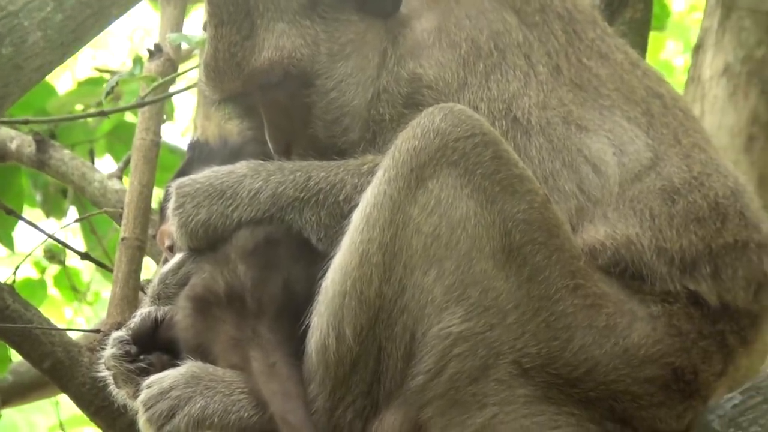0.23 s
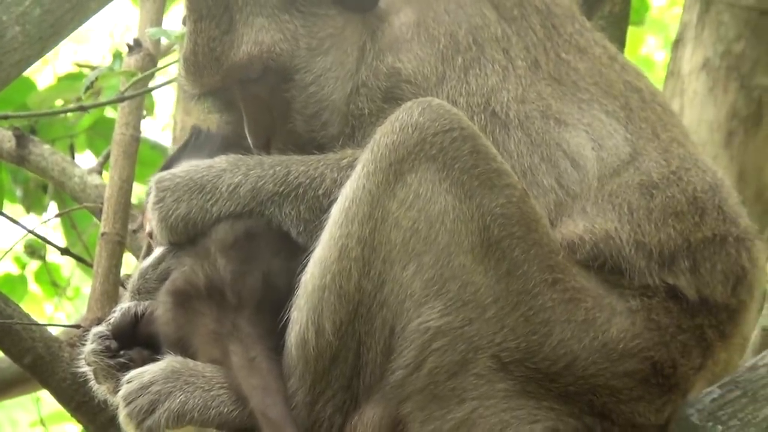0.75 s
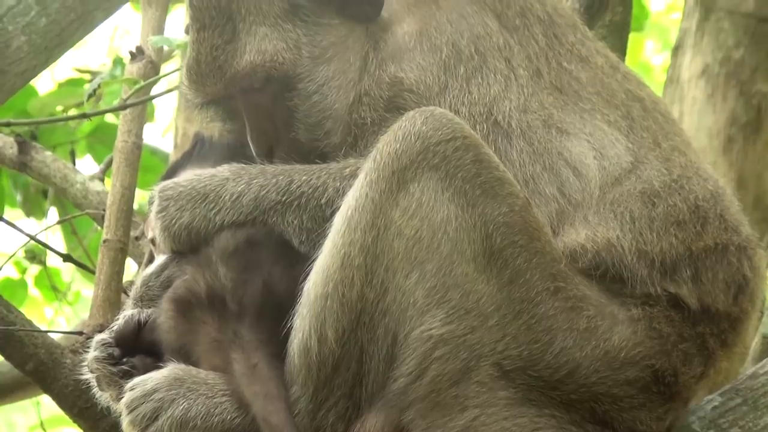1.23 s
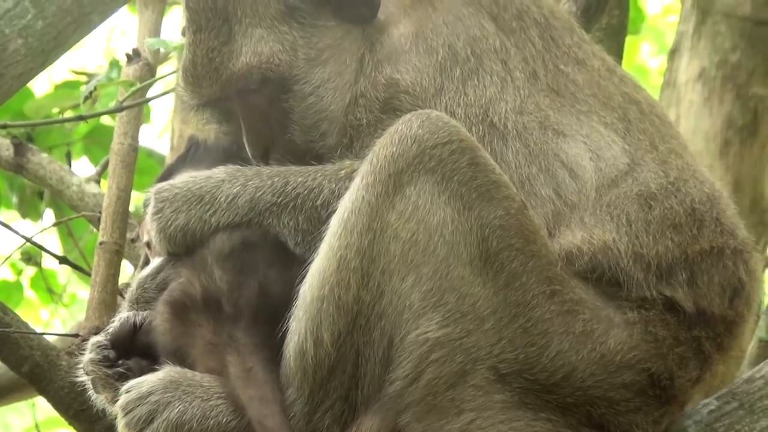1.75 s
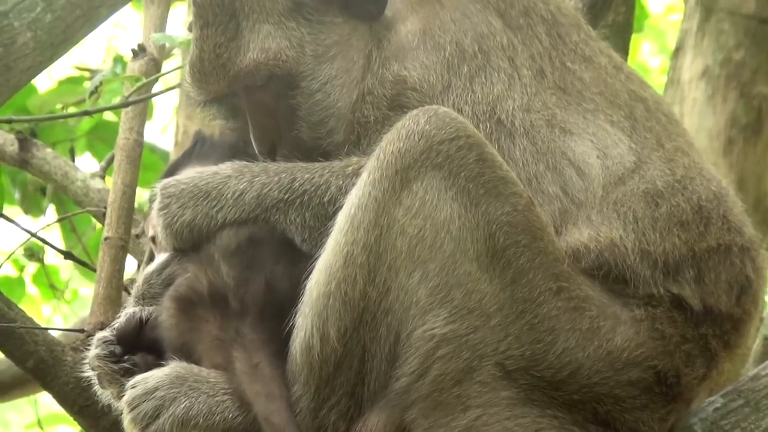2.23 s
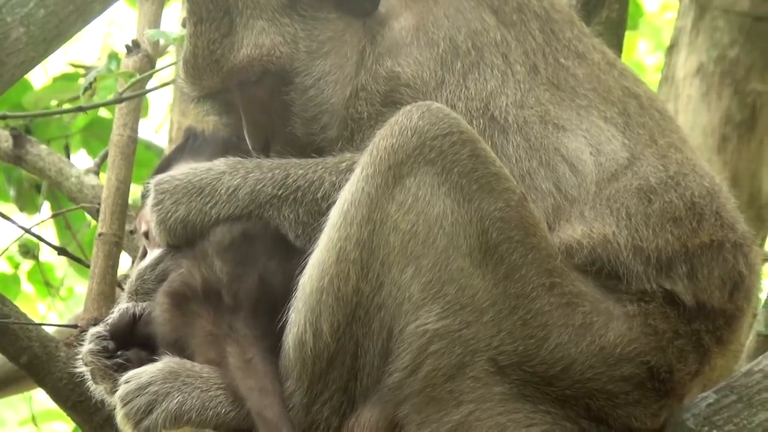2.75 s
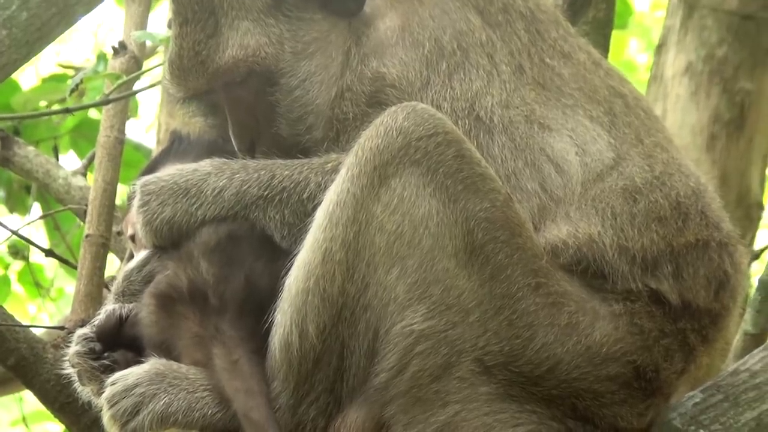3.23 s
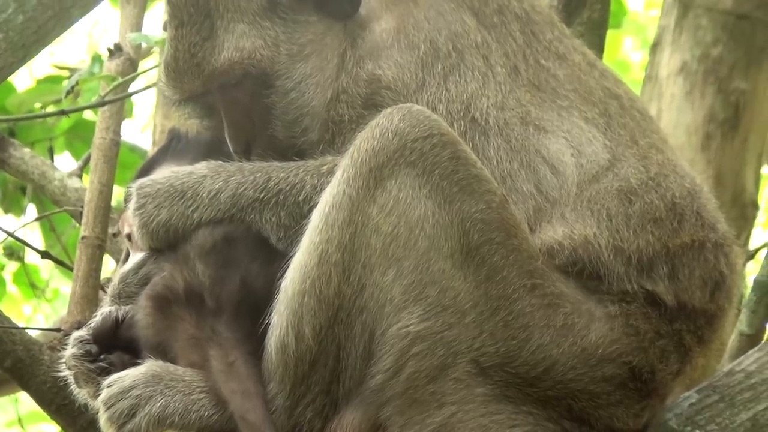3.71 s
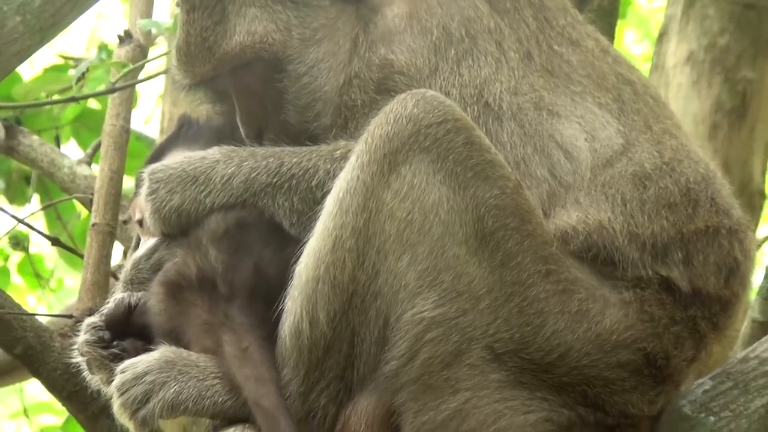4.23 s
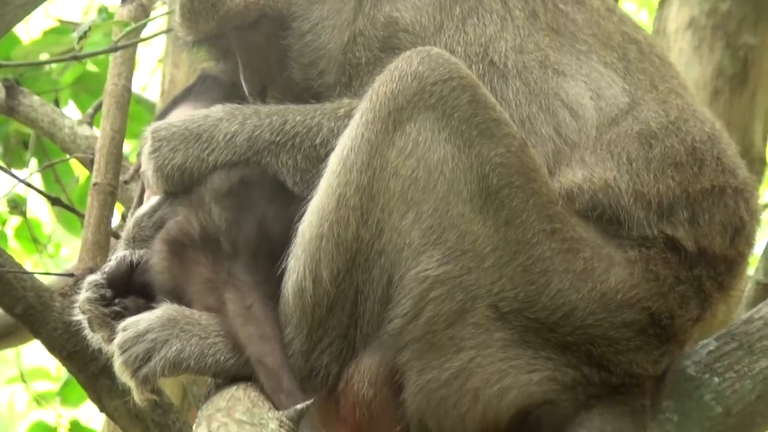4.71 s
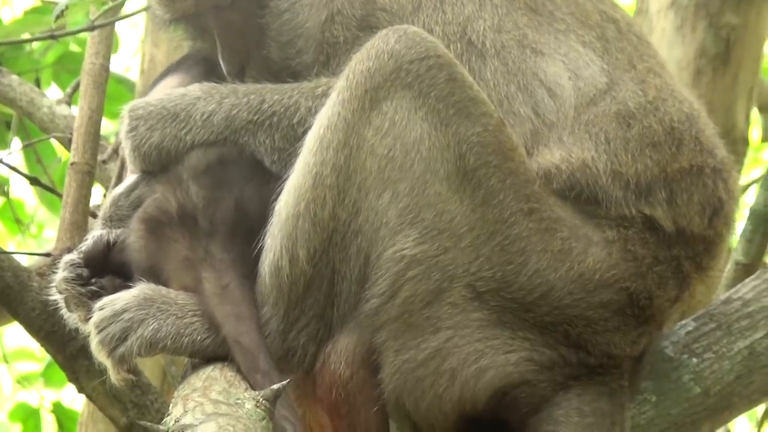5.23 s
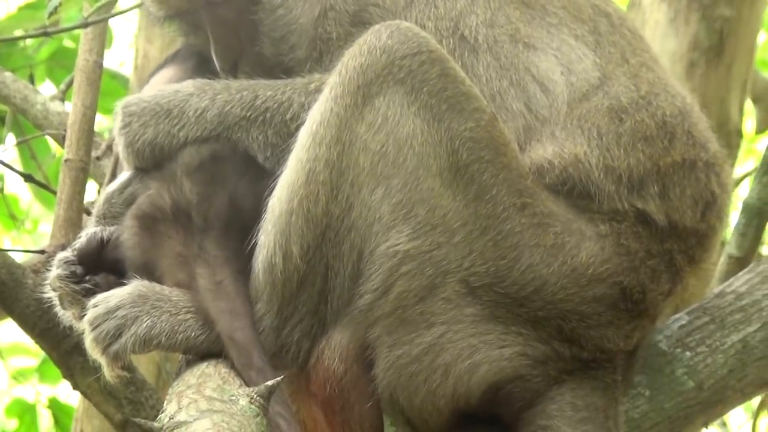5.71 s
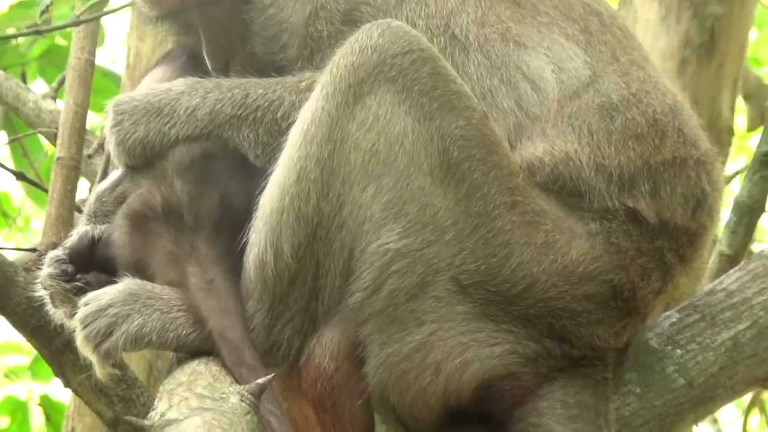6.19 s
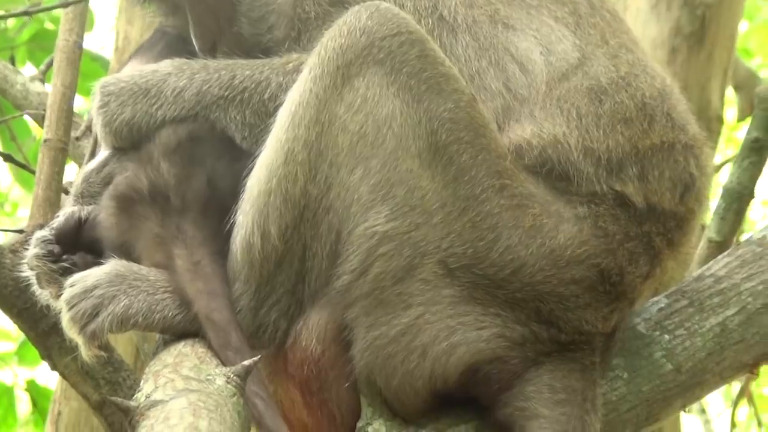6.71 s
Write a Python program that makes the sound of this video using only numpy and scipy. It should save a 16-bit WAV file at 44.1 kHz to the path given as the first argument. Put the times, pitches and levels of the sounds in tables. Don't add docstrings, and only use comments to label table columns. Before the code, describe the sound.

Five arched, whistle-like monkey coos, then four very high piercing squeals breaking into rasps, echoing among trees with rustling foliage and a low far rumble.

```python
import sys
import numpy as np
from scipy import signal
from scipy.fft import rfft, irfft
from scipy.io import wavfile
from scipy.ndimage import uniform_filter1d, map_coordinates

SR = 44100
rng = np.random.default_rng(int(sys.argv[2]) if len(sys.argv) > 2 else 0)


def natural_amplitude(level_db):
    exponent = np.asarray(level_db, float) / 20
    return 10 ** exponent


def bounce(signal):
    frames = np.transpose(np.atleast_2d(signal))
    limited = np.clip(frames, -1, 1)
    pcm = np.round(limited * 32767).astype(np.int16)
    wavfile.write(sys.argv[1], SR, pcm)


N = 306529
T = np.arange(N) / SR
FFT_N = N + 671

# [f/Hz, likeness 0 to 1]
LIKENESS = [(30, .99), (60, 1), (150, 0.89), (300, 0.88), (600, 0.87), (1500, 0.84), (3000, 0.96),
            (5000, 0.87), (10000, 0.74), (12500, 1)]
# [t/s, f/Hz]
COO_PITCHES = [
    [(.558, 1232), (.61, 1428), (.728, 1725), (.809, 1844), (.9, 1897), (1.005, 1826), (1.043, 1686),
     (1.077, 1380), (1.1, 1370)],
    [(1.248, 1083), (1.278, 1276), (1.31, 1383), (1.422, 1524), (1.545, 1546), (1.581, 1447), (1.625, 1470)],
    [(1.808, 1198), (1.845, 1412), (1.9, 1506), (1.96, 1515), (2.0, 1574), (2.06, 1552), (2.11, 1608),
     (2.18, 1521), (2.25, 1416)],
    [(2.495, 1403), (2.59, 1554), (2.715, 1461), (2.85, 1489), (2.95, 1496), (3.066, 1386), (3.11, 1428)],
    [(3.43, 1343), (3.54, 1332), (3.59, 1462), (3.72, 1432), (3.765, 1488), (3.84, 1469), (3.92, 1397),
     (3.97, 1376)],
]
# [t/s, level/dB, left minus right/dB]
COO_PEAKS = [
    (1.04, -39, -1),
    (1.52, -41.5, -2),
    (2.14, -40, 1),
    (2.97, -45, -0.7),
    (3.83, -42.5, 0.5),
]
# [t/s, f/Hz, level/dB]
SQUEAL_WHISTLES = [
    [(4.318, 8670, -46), (4.325, 8800, -40), (4.342, 9560, -38), (4.362, 9830, -43), (4.376, 10020, -36.5),
     (4.42, 10060, -36.5), (4.456, 9500, -36), (4.48, 9770, -43), (4.5, 9700, -33.5)],
    [(5.068, 8300, -43), (5.082, 9150, -36.5), (5.105, 9110, -40), (5.122, 8510, -38.5),
     (5.15, 8860, -43.5), (5.192, 9510, -32.5), (5.21, 8410, -39), (5.232, 8590, -42)],
    [(5.612, 8560, -41), (5.641, 9420, -37), (5.661, 8000, -40), (5.683, 8650, -35.5), (5.705, 8010, -39.5),
     (5.733, 9050, -36.5), (5.757, 8010, -38.5), (5.798, 8140, -42.5)],
    [(6.132, 8100, -52), (6.136, 8400, -34.5), (6.148, 9030, -35), (6.158, 9750, -32.5), (6.2, 9400, -36),
     (6.21, 9040, -41), (6.3, 9200, -37), (6.316, 8350, -36.5)],
]


def unit(x):
    return x / np.sqrt(np.mean(x ** 2) + 1e-20)


def along(points, hz):
    f, v = np.transpose(points)
    return np.interp(np.log(hz + 1), np.log(f + 1), v)


def curves(rows, edge=0.0077):
    s, *cols = np.transpose(rows)
    gate = np.clip(np.minimum(T - s[0], s[-1] - T) / edge + 1, 0, 1)
    return [gate] + [np.interp(T, s, c) for c in cols]


def phrases(tables, edge=0.0018):
    gate = sum(curves([rows[0][:1], rows[-1][:1]], edge)[0] for rows in tables)
    return [gate] + curves(sum(tables, []))[1:]


def moments(events, width_s):
    return sum(db * np.exp(-((T - s) / width_s) ** 2) for s, db in events)


def rounded(curve, seconds):
    return uniform_filter1d(curve, int(seconds * SR) + 1)


def wobble(rate):
    coarse = T[::8]
    knots = rng.standard_normal(int(N * rate / SR) + 4)
    return np.interp(T, coarse, map_coordinates(knots, [coarse * rate]))


def turns(hz):
    return 2 * np.pi * np.cumsum(hz) / SR


def glide(rows):
    gate, hz, db = curves(rows)
    return gate * natural_amplitude(db + 6.0) * np.sin(turns(hz))


def noise(spectrum, alike=((1, 1), (2, 1)), bands=()):
    hz = np.fft.rfftfreq(FFT_N, 1 / SR)
    turn = np.arccos(np.clip(along(alike, hz), -1, 1)) / 2
    level_db = along([(1, -120)] + list(spectrum) + [(SR / 2, -120)], hz)
    level_db = level_db + sum(db * np.exp(-((hz - c) / w * 2) ** 2) for c, w, db in bands)
    shape = natural_amplitude(level_db) * [np.cos(turn), np.sin(turn)]
    mid, side = irfft(rfft(rng.standard_normal((2, FFT_N))) * shape)[:, :N]
    return unit(np.array([mid + side, mid - side]))


def rumble():
    # [f/Hz, level/dB per Hz]
    far_colour = [(15, -42), (27, -16), (36, 0.5), (48, -4), (70, -4), (118, -4.5), (175, -14),
                  (215, -10.5), (380, -15), (508, -13.5), (667, -18), (1110, -18.5), (1700, -22.5),
                  (2000, -27.5), (5000, -34.5)]
    return natural_amplitude(-58.5 + 1.1 * wobble(8) + 0.11 * wobble(2.14)) * noise(far_colour, LIKENESS)


def engine():
    # [t/s, firing late by/s]
    hunting = [(0, .003), (1.2, .0033), (1.95, .0072), (2.75, .0079), (3.8, .0083), (4.8, .0079),
               (5.65, .006), (6.15, .0033), (6.95, -.003)]
    # [delay after firing/s, f/Hz, level/dB, t60/s]
    strokes = [
        (0, 122, -40.5, .036),
        (.004, 204.5, -63, .35),
        (.045, 235, -59, .05),
        (.096, 505, -55, .06),
        (.03, 280, -66, .15),
    ]
    firing_hz, first_firing_s, rise_s = 9.728, 0.7, 0.005
    cycle = (T - first_firing_s - curves(hunting)[1]) * firing_hz + 10
    size = natural_amplitude(1.8 * rng.standard_normal((100, len(strokes))))
    out = np.zeros(N)
    for k, (delay, hz, db, t60) in enumerate(strokes):
        at = cycle - delay * firing_hz
        for back in range(3):
            t = (at % 1 + back) / firing_hz
            ring = natural_amplitude(db - 60 * t / t60) * (1 - np.exp(-t / rise_s)) * np.sin(2 * np.pi * hz * t)
            out += size[at.astype(int) - back, k] * ring
    return out


def foliage():
    # [t/s, level/dB]
    breeze = [(0, -77.5), (.25, -75), (.7, -75.5), (1.8, -74.5), (2.4, -76.5), (2.9, -71), (3.3, -71),
              (4.04, -62.5), (4.3, -64), (4.72, -74), (4.83, -71.5), (4.89, -65), (5.02, -62.5),
              (5.46, -69), (5.6, -67), (6, -71), (6.6, -70), (6.95, -74.5)]
    # [f/Hz, level/dB per Hz]
    leaf_colour = [(1180, 2.5), (2000, -5), (2390, -6), (3220, -4), (3900, -3.5), (7900, 0.5), (12700, -4),
                   (16400, -11)]
    clumps_db = 0.27 * wobble(2.27) + 0.96 * wobble(60)
    return natural_amplitude(curves(breeze)[1] + 4.0 + clumps_db) * noise(leaf_colour, LIKENESS)


def insect():
    # [f/Hz, level/dB per Hz]
    wing_colour = [(9000, -31), (9500, -9), (10000, -2), (10500, -42)]
    nearer_db = 0.5 * np.clip((T - 1.8) / 0.36, 0, 1)
    return natural_amplitude(-82 + nearer_db + 2.5 * wobble(15)) * noise(wing_colour, LIKENESS)


def bird():
    # [t/s, f/Hz, level/dB]
    notes_sung = [
        [(.065, 2950, -71), (.1, 2970, -80), (.125, 2900, -82), (.15, 2670, -72), (.19, 2440, -68)],
        [(.14, 1780, -80), (.17, 1720, -80), (.2, 1540, -68), (.222, 1490, -75)],
    ]
    return sum(glide(rows) for rows in notes_sung)


def shaken_leaves():
    # [f/Hz, level/dB per Hz]
    swish_colour = [(150, -1), (350, 1.5), (900, -9.5), (1400, -11), (1800, -15), (2200, -19), (3000, -13),
                    (4900, -20), (5400, -25), (10500, -35), (12500, -22), (15000, -32)]
    # [f/Hz, width/Hz, level/dB]
    hollows = [(1760, 170, 8), (2530, 390, 10), (3000, 150, 8.5), (3550, 150, 5), (4130, 150, 8),
               (4700, 370, 7.5)]
    start_s, rise_s, hold_s = 0.22, 0.096, 0.012
    rise = np.clip((T - start_s) / rise_s + 0.13, 0, 1)
    fade_db = 121 * np.maximum(T - start_s - rise_s - hold_s, 0) ** 2
    fade_db = fade_db + 19.0 * np.maximum(T - start_s, 0)
    return rise * natural_amplitude(-50.5 - fade_db + 0.96 * wobble(47.0)) * noise(swish_colour, LIKENESS, hollows)


def bough():
    # [t/s, f/Hz, level/dB]
    thump = [(.25, 513, -66), (.27, 336, -54), (.29, 206, -52.5), (.298, 160, -49), (.315, 139, -44.5),
             (.345, 125, -61)]
    # [t/s, f/Hz, level/dB]
    knock = [(.291, 450, -53), (.297, 350, -46), (.305, 286, -52), (.33, 265, -62)]
    return (glide(thump) + glide(knock)) * natural_amplitude([[1.5], [-1.5]])


def coo_breath():
    attack_s, release_s = 0.0041, 0.012
    gate, peak_db = np.zeros((2, N))
    for rows, (_, db, _) in zip(COO_PITCHES, COO_PEAKS):
        start, end = rows[0][0], rows[-1][0]
        gate += np.clip(np.minimum((T - start) / attack_s, (end - T) / release_s), 0, 1)
        peak_db += ((T > start) & (T < end)) * db
    return gate, peak_db


def coos():
    # [t/s, jump/Hz, length/s]
    flips = [(1.494, 47, 0.041), (1.881, 200, 0.024), (1.922, 285, 0.018), (2.114, 99.7, 0.013),
             (2.513, 55, 0.021), (2.694, 37, 0.014), (2.851, 27, 0.02), (3.521, 57.8, 0.0121),
             (3.561, 120, 0.018), (3.61, 84, 0.018), (3.813, 17, 0.014)]
    # [f/Hz, level/dB]
    throat = [(3000, 8), (4500, -2.5), (5000, -12), (5700, -12.5), (6100, -15), (6400, -10), (7500, -16.5),
              (9000, -2.5), (10500, -6.5), (12000, 1.5), (13500, -19), (16000, -28)]
    # [t/s, depth/dB]
    catches = [(0.644, -8), (.705, -11), (0.781, -8), (.81, -9), (.925, -6), (.99, -15), (1.02, -1),
               (1.32, 0), (1.411, -7), (1.491, -18), (1.562, -14), (1.881, -8), (1.925, -6), (2.01, -10),
               (2.095, -10), (2.114, -8), (2.145, -9), (2.2, -3), (2.528, -24), (2.56, -15), (2.68, -32),
               (2.85, -3), (2.885, -11), (2.935, -2), (3.485, -5), (3.57, -8), (3.82, -11), (3.89, -4)]
    # [t/s, level/dB]
    glints = [(.625, -15), (.665, -10), (.69, -8), (.85, -9), (.965, -2), (1.39, -10), (1.489, -5),
              (1.855, -15), (1.899, -8), (2.005, -6), (2.045, -4), (2.145, -10), (2.2, -2), (2.55, -17),
              (2.665, -16), (2.74, -1), (2.805, -5), (2.838, -24), (2.865, 7), (2.9, -18), (2.945, 10),
              (3.49, -7), (3.555, -7), (3.597, -6), (3.61, 8), (3.625, -8), (3.91, -6)]
    # [t/s, first partial level/dB, second over first/dB]
    low_levels = [
        [(0.562, -50.5, -7), (0.672, -42.5, -3), (0.8, -53.5, 9), (0.862, -46.5, -4), (0.932, -54.5, 2.5),
         (0.964, -44, -3), (0.986, -55.5, 12.5), (1.064, -43.5, 1.5), (1.1, -59, -19)],
        [(1.252, -48, -16), (1.282, -42.5, -12.5), (1.312, -49.5, -4), (1.394, -44, -13.5), (1.416, -49, 3),
         (1.44, -41.5, -3), (1.546, -41, -3.5), (1.608, -50.5, -15), (1.625, -62, -3)],
        [(1.812, -48, -12.5), (1.93, -53, 7), (1.942, -44, -5.5), (2.072, -40, -6), (2.082, -46.5, 3),
         (2.172, -38.5, -5.5), (2.192, -47.5, -1.5), (2.218, -45.5, -12), (2.25, -57, -3)],
        [(2.5, -57.5, -9.5), (2.694, -47.5, -4), (2.71, -48, -15.5), (2.892, -51.5, 3.5), (2.902, -48.5, -16),
         (2.948, -50, -5.5), (2.974, -44, -13.5), (3.076, -49.5, -4.5), (3.11, -63, -20)],
        [(3.435, -60, -9), (3.459, -53.5, -12), (3.487, -62, -15), (3.535, -51, -10), (3.689, -49.5, -4.5),
         (3.767, -46, -10), (3.813, -47, -3), (3.939, -50, -8), (3.965, -67, -15)],
    ]
    # [t/s, upper partials level/dB over the peak]
    opening = [
        [(.57, -33), (.66, -21), (.75, -7.5), (.91, -1), (1.03, -0.5), (1.07, -19.5)],
        [(1.27, -18.5), (1.4, -14), (1.55, -14), (1.61, -26)],
        [(1.82, -26.5), (1.89, -22), (2.09, -13.5), (2.235, -19.5)],
        [(2.5, -51), (2.62, -22.5), (2.8, -15), (2.97, -10), (3.07, -21.5)],
        [(3.46, -40), (3.55, -25), (3.65, -19), (3.8, -14), (3.95, -20.5)],
    ]
    hz = rounded(phrases(COO_PITCHES)[1], 0.021)
    hz = hz + sum(jump * np.exp(-np.abs((T - s) / length * 2) ** 3) for s, jump, length in flips)
    slur_db = -np.abs(rounded(np.gradient(hz) * SR, .004)) / 4000
    hz = hz + 7 * wobble(70)
    phase = turns(hz)
    upper = np.zeros(N)
    for k in range(3, 11):
        partial_db = along(throat, k * hz) + 1.9 * wobble(50) + 2.06 * wobble(140) + slur_db
        upper += natural_amplitude(partial_db) * np.sin(k * phase)
    gate, peak_db = coo_breath()
    _, first_db, second_db = phrases(low_levels)
    first = natural_amplitude(moments(catches, 0.0077)) * natural_amplitude(0.25 * wobble(70)) * np.sin(phase)
    second = natural_amplitude(second_db + 0.67 * wobble(70) + moments(glints, 0.0083)) * np.sin(2 * phase)
    low = 1.485 * natural_amplitude(first_db) * (first + second)
    return gate * (low + natural_amplitude(peak_db + phrases(opening)[1] - 4.0) * upper)


def grove(x):
    # [f/Hz, t60/s]
    echo_t60 = [(1000, 0.36), (3000, 0.35), (6000, 0.43), (11000, 0.39), (16000, 0.31)]
    # [f/Hz, level/dB]
    spread = [(1000, -4), (2500, -22.5), (5000, -12), (11000, -10.5), (12000, -23)]
    out = np.zeros((2, N + SR))
    step = SR // 4
    for start in range(0, N, step):
        hz, t, z = signal.stft(rng.standard_normal((2, SR // 2)), SR, nperseg=256)
        decay = natural_amplitude(-60 * t / along(echo_t60, hz)[:, None])
        decay = decay + 2.62 * natural_amplitude(-60 * t / 0.081)
        z[1] *= natural_amplitude(along(spread, hz))[:, None]
        common, apart = signal.istft(z * decay, SR, nperseg=256)[1]
        tail = np.array([common + apart, common - apart]) / np.linalg.norm(common)
        begin = max(start - step, 0)
        piece = x[begin:start + step]
        fade = np.hanning(2 * step)
        fade = fade[-len(piece):] if start == 0 else fade[:len(piece)]
        answer = signal.fftconvolve((piece * fade)[None], tail, axes=1)
        out[:, begin + 130:][:, :answer.shape[1]] += answer
    return out[:, :N]


def ticks():
    # [t/s, level/dB, centre f/Hz, length/s, width/octaves]
    snaps = [(1.411, -51, 3980, 0.003, .9), (1.417, -54, 7000, 0.0025, 1.3), (1.428, -58, 8000, 0.004, 1.5),
             (1.435, -63, 8000, .012, 0.94), (2.893, -68, 12500, .006, .3), (2.994, -61, 6400, 0.0031, .35),
             (3.051, -66, 7000, .004, .9), (3.076, -62, 10950, .018, 1.1), (3.27, -66, 12100, 0.01, 1.3),
             (3.489, -62, 11500, .005, 0.51), (3.508, -60.5, 7500, 0.012, 1.14),
             (3.718, -63, 4790, 0.005, .3), (3.768, -62, 9530, 0.038, 1), (3.972, -58, 8600, 0.0039, 0.38),
             (4.117, -73.5, 10000, 0.02, .9), (4.187, -60, 7460, 0.014, 0.67),
             (4.216, -57, 10760, 0.016, 2), (5.467, -60, 9000, .006, .6), (6.601, -63.5, 2457, 0.016, 0.87)]
    out, t = np.zeros((2, N + SR)), np.arange(-2000, 2000) / SR
    hz = np.fft.rfftfreq(len(t), 1 / SR)
    for s, db, centre_hz, length, width in snaps:
        grain = rng.standard_normal((2, len(t)))
        stereo = grain[0] + 0.15 * grain[1] * [[1], [-1]]
        band = np.exp(-(np.log2(hz / centre_hz + 1e-9) / width) ** 2)
        puff = unit(irfft(rfft(stereo) * band))
        out[:, round(s * SR) - 2000:][:, :len(t)] += natural_amplitude(db) * puff * np.exp(-(t / length) ** 2)
    return out[:, :N]


def split(rows, phase, count):
    spans = [[(s, *rest), (s + length, *rest)] for s, length, *rest in rows]
    gate, below_db, above_db, slip = phrases(spans)
    slip = slip * wobble(300)
    below, above = np.zeros((2, N))
    for k in range(1, count):
        line_db = below_db + 28.0 * np.log2(k / (count - 1))
        below += natural_amplitude(line_db) * np.sin(k / count * phase + slip)
    for k in range(count + 1, 2 * count):
        above += natural_amplitude(above_db - 3.0 * (k - count - 1.5)) * np.sin(k / count * phase + slip)
    flutter = natural_amplitude(0.5 + 6.7 * np.tanh(wobble(130)) + 1.6 * np.tanh(wobble(400)))
    return gate * flutter * (below + above)


def whistles():
    # [t/s, depth/dB]
    stumbles = [(4.338, -15), (4.368, -20), (4.399, -7), (4.439, -8), (4.451, -12), (5.091, -17),
                (5.128, -8), (5.185, -7), (5.625, -7), (5.687, -10), (5.698, -8), (5.733, -8), (6.146, -6),
                (6.185, -10), (6.208, -17), (6.27, -4), (6.281, -4)]
    # [t/s, f/Hz, level/dB]
    undertones = [
        [(5.635, 4440, -76), (5.67, 4260, -69)],
        [(5.698, 4405, -65), (5.74, 4517, -57), (5.755, 4300, -62)],
        [(5.078, 8450, -57), (5.12, 8590, -43)],
        [(5.186, 3420, -63), (5.215, 3000, -67)],
        [(5.184, 15900, -50), (5.203, 15600, -52)],
        [(5.768, 2710, -68), (5.786, 2680, -67)],
        [(6.222, 6500, -77), (6.262, 6500, -70)],
    ]
    # [t/s, length/s, lines below/dB, lines above/dB, slip/rad]
    halves = [
        (4.454, 0.03, -54, -39, .6),
        (5.652, .026, -75, -51, 1.4),
        (5.694, 0.023, -78, -43, 2.2),
        (5.721, 0.037, -78, -43, 1.0),
        (6.213, 0.095, -52.5, -47.5, 0.8),
    ]
    thirds = [
        (5.125, 0.041, -80, -60, 1.5),
        (5.184, 0.031, -50, -43, 2.5),
        (5.216, 0.027, -36, -38, 1),
        (5.757, 0.033, -51, -46.5, 1.3),
        (6.302, 0.015, -49, -34.5, .8),
    ]
    quarters = [
        (4.44, 0.012, -61, -66, 1.4),
        (4.47, 0.014, -46, -64, 1.3),
    ]
    gate, hz, db = phrases(SQUEAL_WHISTLES, 0.00086)
    hz = rounded(hz, 0.0032) + 40 * wobble(160)
    phase = turns(hz)
    db = db + moments(stumbles, 0.0023) + 3.4 * np.tanh(wobble(300))
    octave = natural_amplitude(-11) * (hz < 8400) * np.sin(2 * phase)
    tone = gate * natural_amplitude(db) * (1.11 * np.sin(phase) + octave)
    hum = sum(glide(rows) for rows in undertones) * natural_amplitude(4.7 * np.tanh(wobble(110)) + 2.9 * wobble(350))
    return tone + hum + split(halves, phase, 2) + split(thirds, phase, 3) + split(quarters, phase, 4)


def arc(share, at, db, before_db, after_db):
    return db - np.maximum(before_db * (at - share), after_db * (share - at))


def breaking():
    # [t/s, length/s, effort level/dB]
    rasp_spans = [
        (4.478, 0.062, -31.5),
        (5.226, 0.054, -37),
        (5.758, 0.063, -39.5),
        (6.309, 0.044, -34),
    ]
    # [hiss/dB, shrill hiss/dB, leak before it/dB, pitch scatter/Hz]
    rasp_breath = [
        (-1.5, -3, -26.5, 1160),
        (2.5, -1, -17, 780),
        (0, 6.5, -25, 417),
        (0, 2, -28, 600),
    ]
    rasp_arcs = [
        (.35, 0.53),
        (.6, 0.43),
        (.75, .6),
        (.75, 0.54),
    ]
    # [share of the length, f/Hz]
    plunges = [
        [(0, 7184), (.45, 6677), (.72, 4300), (.9, 4055), (1, 3497)],
        [(0, 5790), (.4, 5760), (.6, 4500), (.8, 3907), (1, 2595)],
        [(0, 6100), (.25, 5775), (.55, 5000), (.75, 4300), (1, 3146)],
        [(0, 5770), (.4, 5130), (.7, 4150), (1, 3614)],
    ]
    out = np.zeros((6, N))
    calls = zip(SQUEAL_WHISTLES, plunges, rasp_spans, rasp_breath, rasp_arcs)
    for whistle, plunge, (s, length, db), breath, (smear_at, hiss_at) in calls:
        hiss_db, shrill_db, leak_db, scatter_hz = breath
        span = slice(round(whistle[0][0] * SR), round((s + length) * SR))
        share = (T[span] - s) / length
        inside = np.clip(share, 0, 1)
        leak_db = db + leak_db + 154 * np.minimum(T[span] - s, 0)
        voice_db = db + arc(share, 1.7, 0.5, 9.5, 4) + 110 * np.minimum(share, 0)
        hiss = np.clip(share / 0.24 + 0.4, 0, 1) * natural_amplitude(db + hiss_db + arc(share, hiss_at, -0.89, 16, 17))
        shrill = np.clip(share / 0.2 + .45, 0, 1) * natural_amplitude(db + shrill_db + arc(share, -0.7, 4.5, 13, 13))
        out[0, span] = np.interp(inside, *np.transpose(plunge))
        out[1, span] = scatter_hz * (.5 + 0.62 * np.sin(np.pi * inside ** 0.7))
        out[2, span] = natural_amplitude(voice_db)
        out[3, span] = hiss + natural_amplitude(leak_db)
        out[4, span] = shrill + natural_amplitude(leak_db + 9.5)
        out[5, span] = np.clip(share / 0.27, 0, 1) * natural_amplitude(db + arc(share, smear_at, -0.58, 7, 4.8))
    return out[0], out[1], *[rounded(gain, 0.00075) for gain in out[2:]]


def rasps():
    # [f/Hz, level/dB per Hz]
    mouth_hiss = [(2300, -16.5), (3100, -7), (4300, -10.5), (6500, 1), (8000, 0.5), (10000, 0),
                  (11500, -4.5), (13000, -29)]
    # [f/Hz, level/dB per Hz]
    shrill_hiss = [(9500, -49), (11000, -3), (12000, 6), (13000, 3), (14300, 6), (15300, -2), (16200, -6),
                   (18000, 12.5)]
    # [f/Hz, level/dB per Hz]
    low_puff = [(2600, -17), (3300, -13), (4500, 1), (6000, 3), (7000, -5), (8000, -20)]
    # [f/Hz, level/dB]
    gape = [(2600, -22), (3200, -12), (3800, -4), (4300, 8), (5200, 5), (7000, -5)]
    # [t/s, length/s, shrill level/dB, low level/dB]
    puff_list = [
        (4.4, 0.044, -53, -72),
        (5.076, 0.027, -59, -70),
        (5.123, 0.05, -59, -70),
        (5.179, 0.057, -43, -55),
        (5.617, 0.035, -60, -71),
        (5.7, 0.1, -46, -63.5),
        (6.146, 0.028, -57, -65),
        (6.26, 0.042, -47, -59),
    ]
    # [t/s, f/Hz, level/dB]
    landings = [
        [(4.526, 4300, -42), (4.533, 4150, -36), (4.54, 3950, -43)],
        [(4.534, 3500, -46), (4.546, 3300, -44)],
        [(5.796, 5900, -50), (5.812, 5700, -50)],
        [(5.258, 4500, -47), (5.268, 4250, -45)],
        [(6.338, 4150, -46), (6.349, 3750, -46)],
    ]
    hz, spread_hz, voiced, hiss, shrill, smeared = breaking()
    grit, sputter = natural_amplitude(1.4 * wobble(500)), natural_amplitude(2.5 * wobble(120))

    phase = turns(hz + 0.687 * spread_hz * np.tanh(wobble(550)))
    voice = 1.35 * np.sin(phase) + natural_amplitude(-16.5) * sputter * np.sin(2 * phase)
    voice += natural_amplitude(-13) * grit * np.sin(1.9 * phase) + natural_amplitude(-23.5) * np.sin(phase / 2)
    voice *= natural_amplitude(-4) * voiced * natural_amplitude(along(gape, hz) + 5.0 * np.tanh(wobble(250)))

    mouth = np.zeros(N)
    for band_hz in (4500, 7000, 10000):
        mouth += natural_amplitude(3.9 * np.tanh(wobble(90))) * noise(mouth_hiss, bands=[(band_hz, 2500, 9)])[0]
    breath = hiss * mouth / 1.8 + shrill * sputter * natural_amplitude(1.2 * wobble(40)) * noise(shrill_hiss)[0]

    plunge = turns(hz)
    chaos = np.zeros(N)
    smear_hz = 898.7
    for k, db in [(1, -0.5), (1.5, -7.5)]:
        smear = wobble(smear_hz) * np.sin(k * plunge) + wobble(smear_hz) * np.cos(k * plunge)
        chaos += natural_amplitude(db) * smear
    chaos *= smeared * natural_amplitude(2.5 * np.tanh(wobble(140)))

    spans = [[(s, high, low), (s + length, high + 1.3, low + 1.0)] for s, length, high, low in puff_list]
    gate, shrill_db, low_db = phrases(spans, 0.0063)
    puffs = natural_amplitude(shrill_db) * noise(shrill_hiss)[0] + natural_amplitude(low_db) * noise(low_puff)[0]
    puffs *= gate * sputter

    locked = grit * sum(glide(rows) for rows in landings)
    burst = chaos + locked + puffs + voice + grit * breath
    return signal.sosfilt(signal.butter(4, 2200, "high", fs=SR, output="sos"), burst)


def scene():
    background = rumble() + engine() + foliage() + insect() + bird()
    coo, squeal = coos(), whistles() + rasps()
    side_db = curves([(row[0], row[-1]) for row in COO_PEAKS])[1]
    near = coo * natural_amplitude(side_db / 2 * [[1], [-1]]) + squeal * natural_amplitude([[.2], [-.2]])
    echo = grove(natural_amplitude(-4.5) * coo + natural_amplitude(-1.0) * squeal)
    return background + shaken_leaves() + bough() + near + echo + ticks()


def top_cut(x):
    return signal.sosfilt(signal.butter(12, 16550, fs=SR, output="sos"), x)


def record(dry):
    passed = np.fft.rfftfreq(FFT_N, 1 / SR) < 16550
    kept = irfft(rfft(dry, FFT_N) * passed)[:, :N]
    return top_cut(kept)


dry = scene()
out = record(dry)
bounce(out)
```